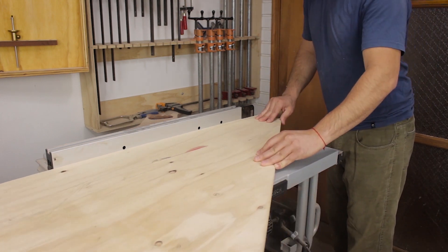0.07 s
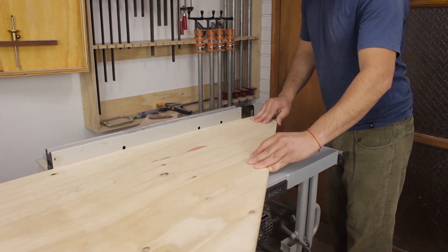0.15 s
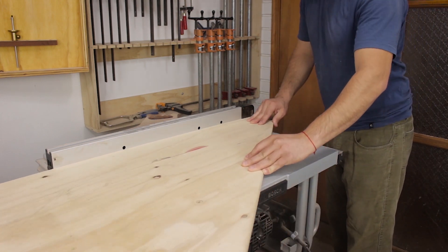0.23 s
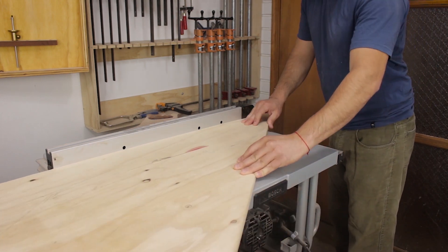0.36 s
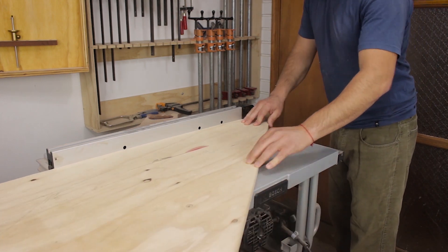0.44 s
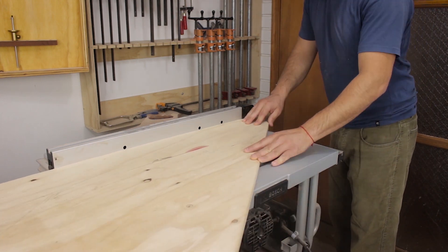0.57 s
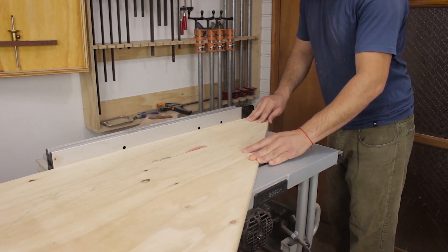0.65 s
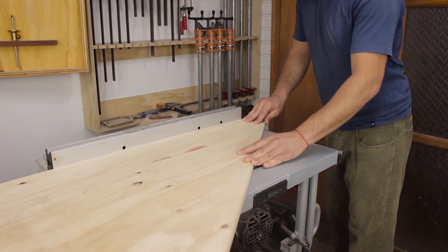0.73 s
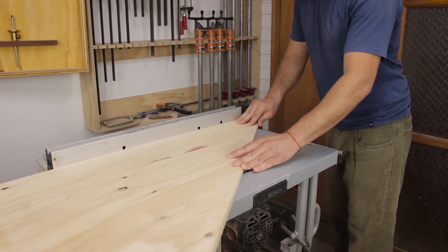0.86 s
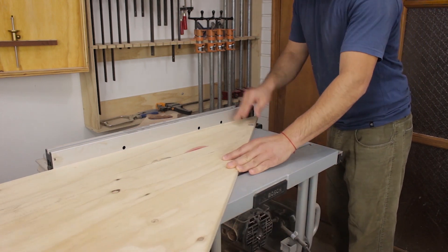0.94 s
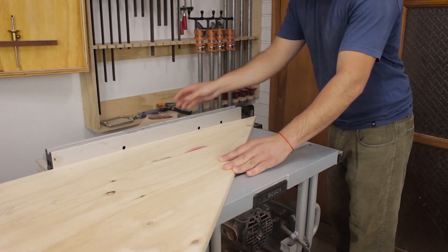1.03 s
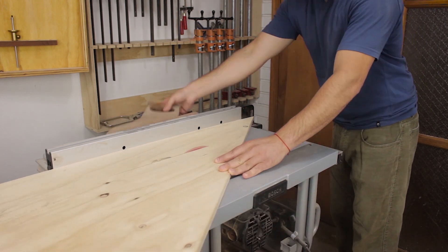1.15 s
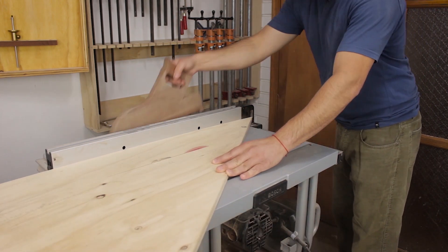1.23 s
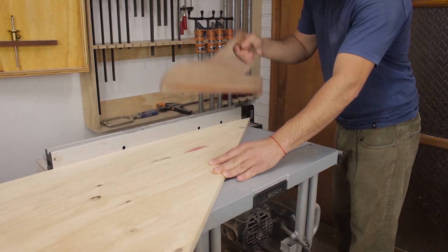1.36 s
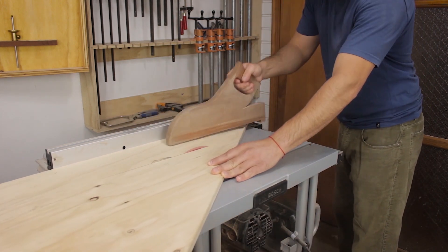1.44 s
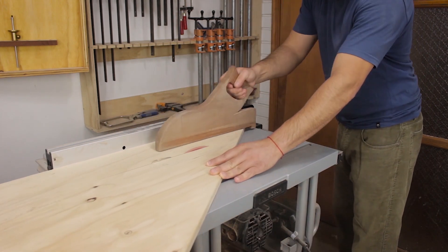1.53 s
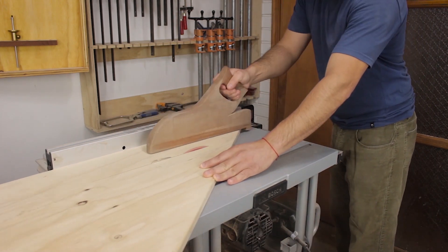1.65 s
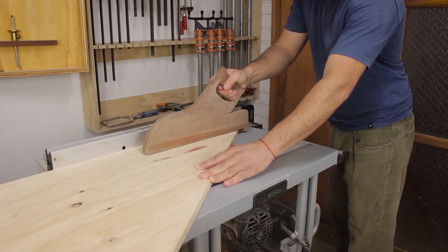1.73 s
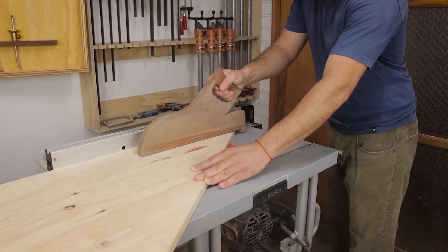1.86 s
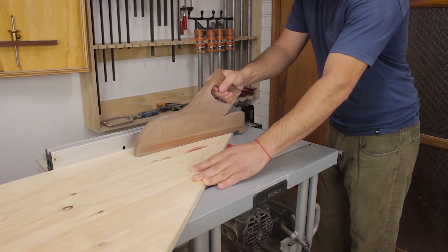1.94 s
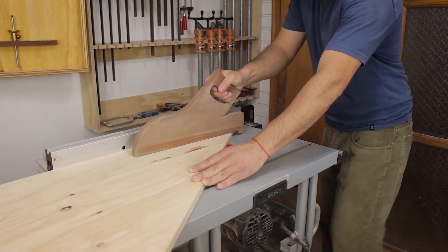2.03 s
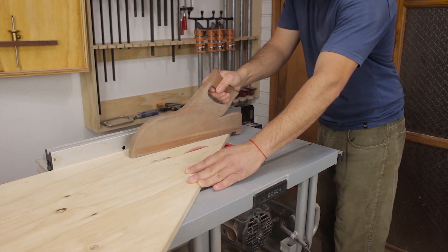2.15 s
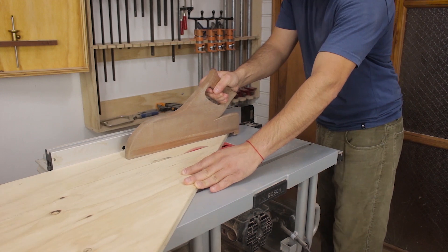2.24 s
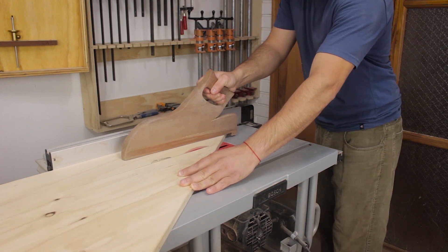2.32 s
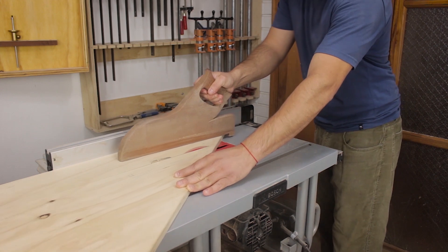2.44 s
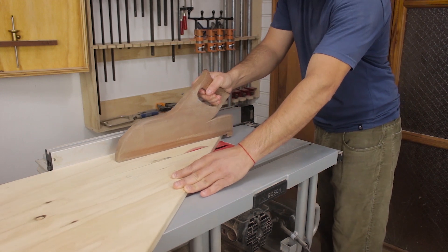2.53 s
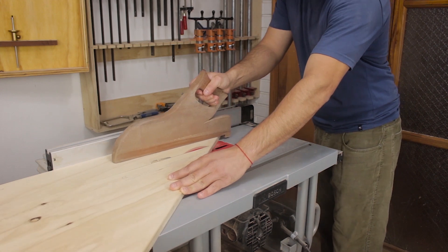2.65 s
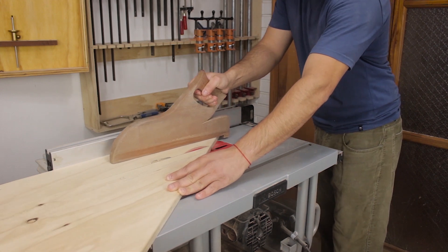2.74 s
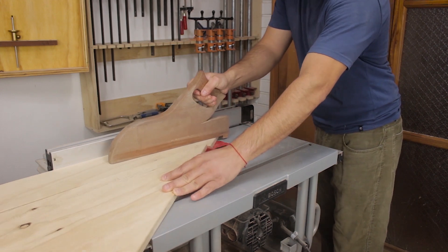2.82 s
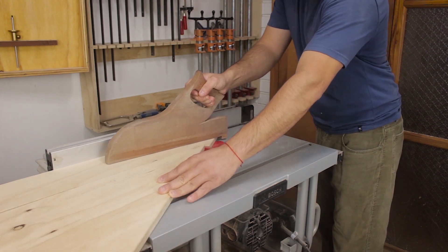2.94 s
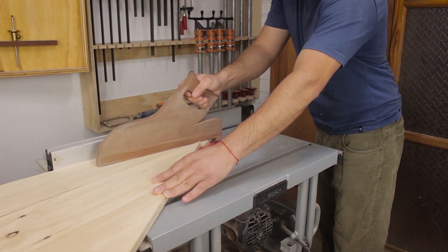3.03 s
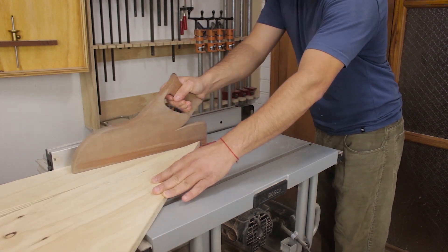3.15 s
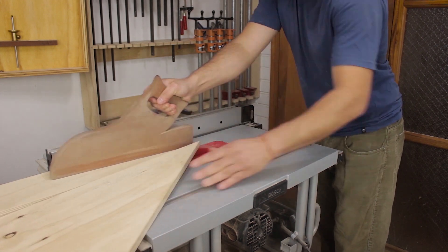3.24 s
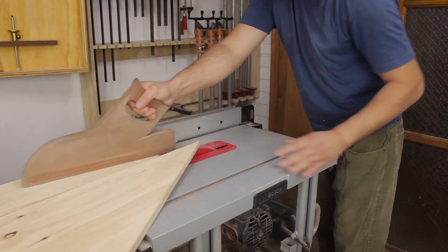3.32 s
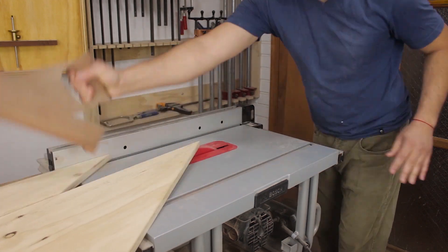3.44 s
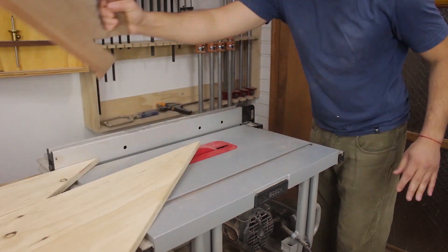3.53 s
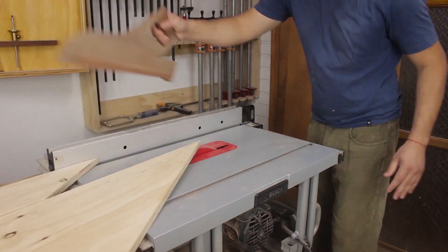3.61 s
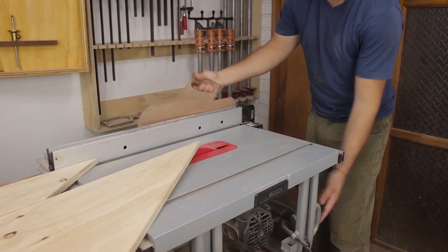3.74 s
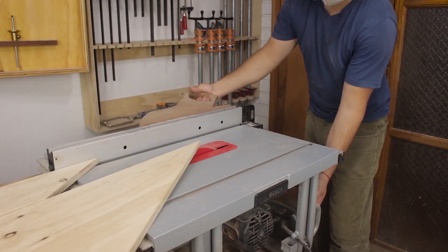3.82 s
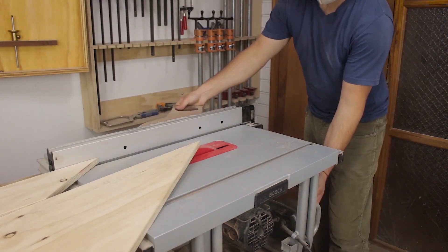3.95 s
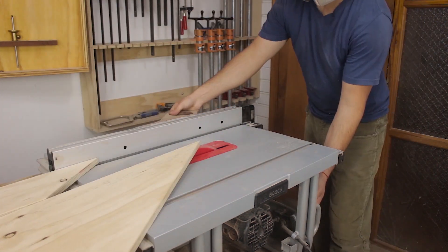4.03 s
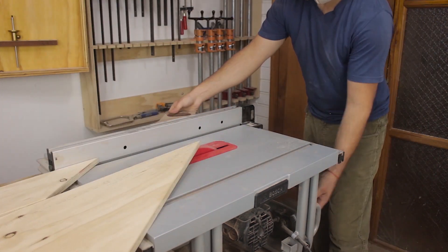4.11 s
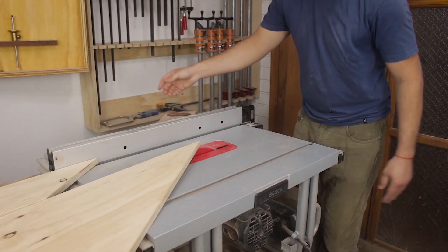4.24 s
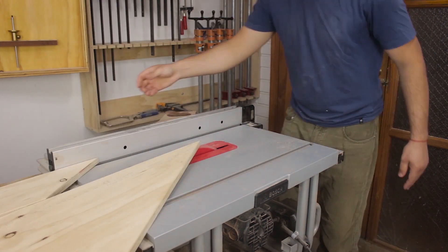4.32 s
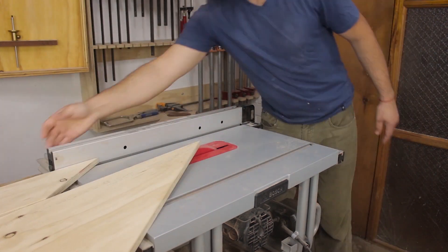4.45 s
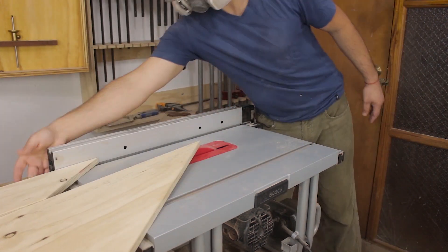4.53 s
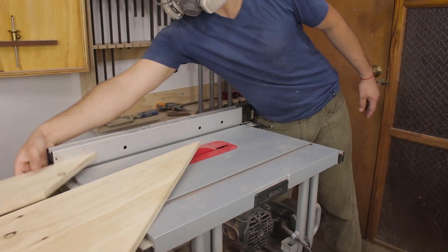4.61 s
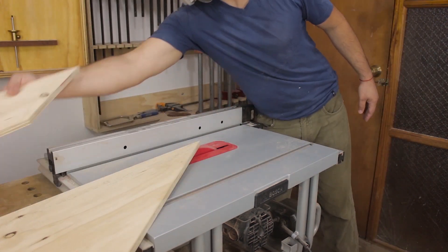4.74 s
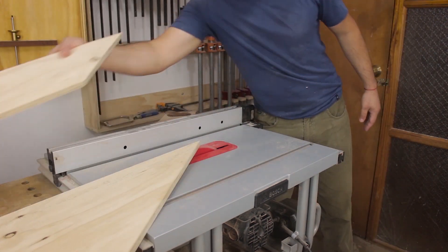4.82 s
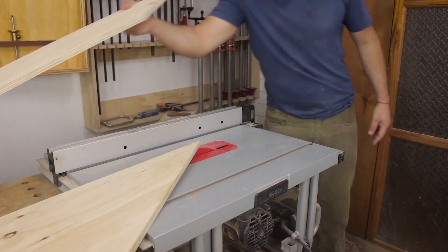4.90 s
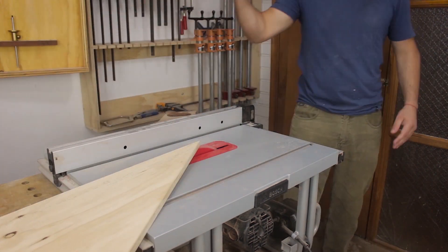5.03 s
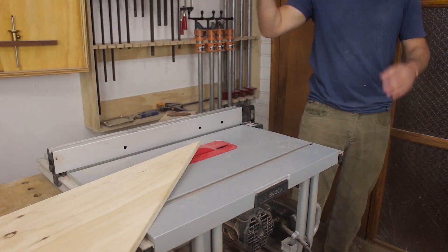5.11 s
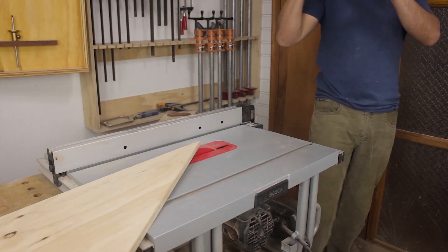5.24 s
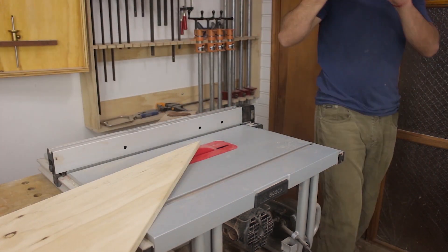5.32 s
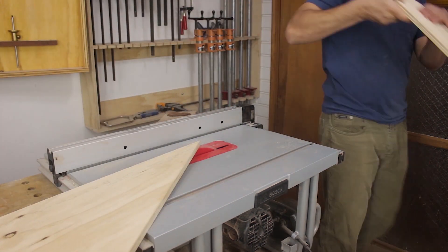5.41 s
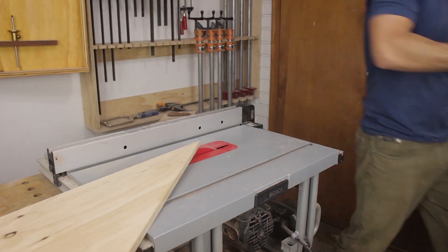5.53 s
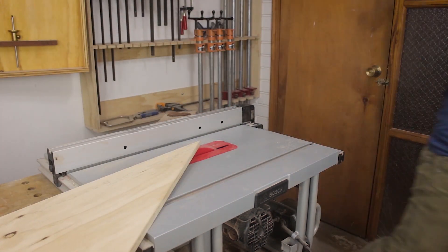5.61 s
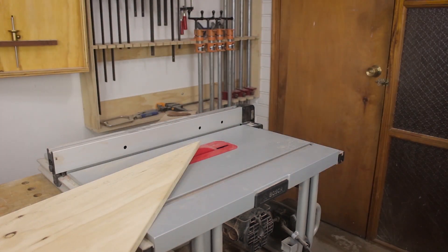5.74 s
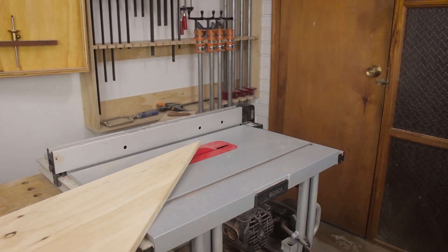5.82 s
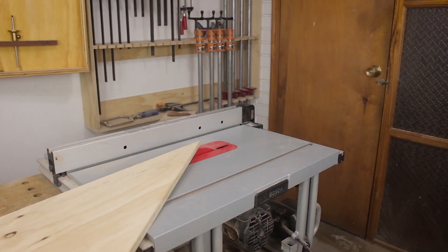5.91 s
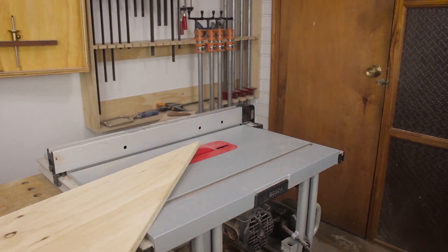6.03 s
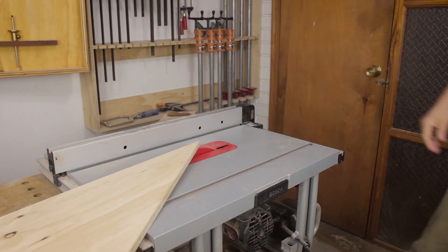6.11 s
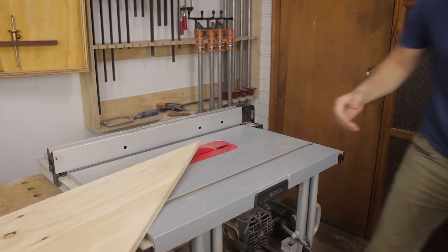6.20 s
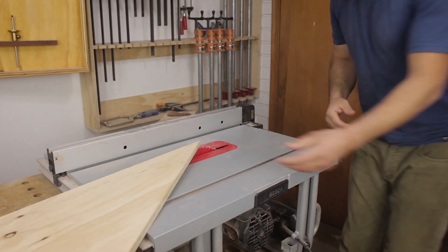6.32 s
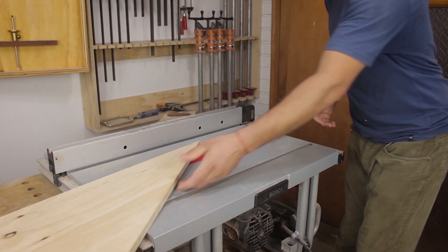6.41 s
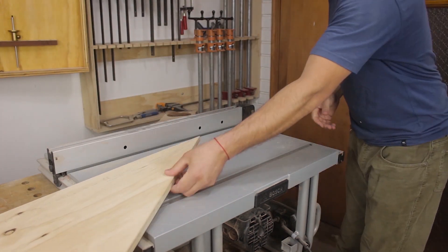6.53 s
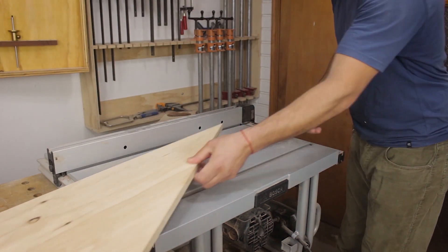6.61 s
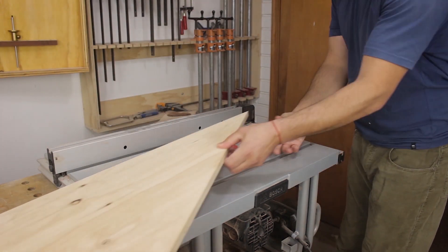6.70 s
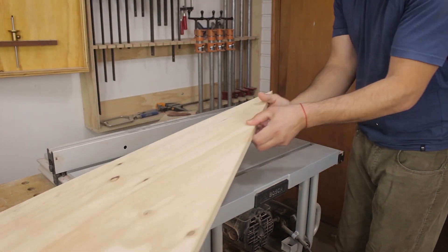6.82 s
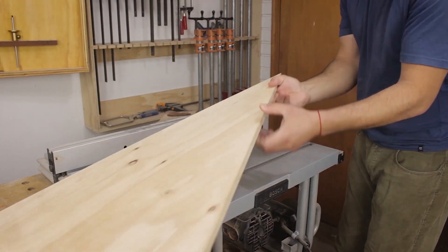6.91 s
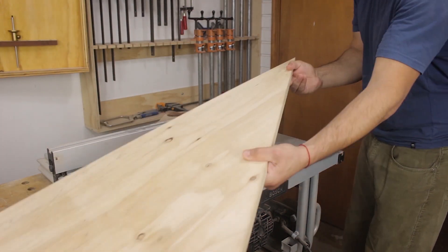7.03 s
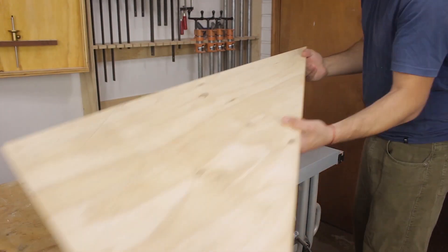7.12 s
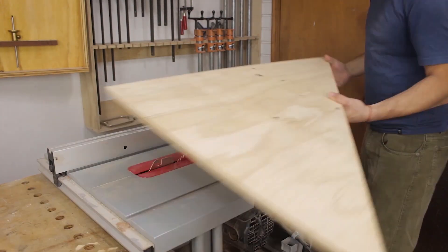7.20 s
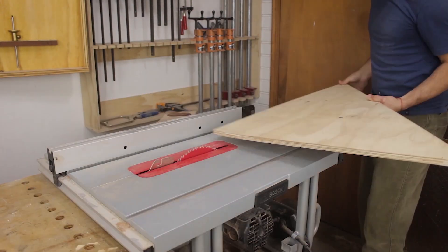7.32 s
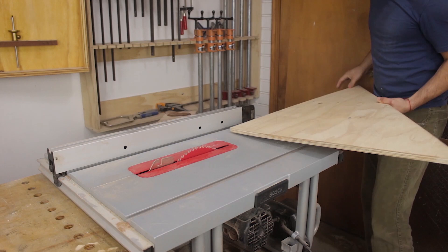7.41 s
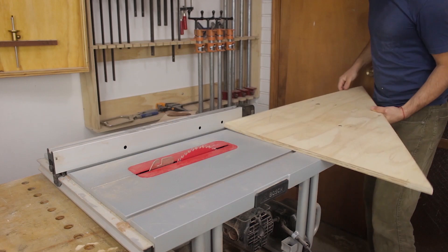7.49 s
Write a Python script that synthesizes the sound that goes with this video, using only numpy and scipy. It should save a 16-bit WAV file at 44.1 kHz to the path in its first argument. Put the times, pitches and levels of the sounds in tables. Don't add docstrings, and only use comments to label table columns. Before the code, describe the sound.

In a small workshop, a table saw is already cutting plywood, its harsh motor whine and chip hiss wavering under load. Wood knocks sharply as the cut ends, and the saw runs free, brighter and steadier. Switched off, it glides down to a stop, leaving quiet for a soft drag of the sheet and a few final knocks. One microphone, nearly mono, short room tail.

```python
import sys
import numpy as np
from scipy import signal
from scipy.fft import rfft, irfft, next_fast_len
from scipy.io import wavfile
from scipy.ndimage import uniform_filter1d, map_coordinates

SR = 44100
rng = np.random.default_rng(int(sys.argv[2]) if len(sys.argv) > 2 else 0)


def to_linear_factor(level_db):
    exponent = np.asarray(level_db, float) / 20
    return 10 ** exponent


def materialize(psi):
    bounded = np.clip(np.atleast_2d(psi).T, -1, 1)
    quanta = np.round(bounded * 32767).astype(np.int16)
    wavfile.write(sys.argv[1], SR, quanta)


N = 333396
T = np.arange(N) / SR

# [t/s, turn rate f/Hz]
DRIVEN_SPEED = [(0, 984.9), (.068, 946.5), (.219, 905.8), (.445, 897.6), (.554, 971.2), (.725, 1023.9),
                (.966, 928.5), (1.078, 935.5), (1.605, 995.3), (1.786, 958.5), (1.976, 948.2),
                (2.147, 980.5), (2.407, 947.3), (2.629, 955.8), (2.83, 992.6), (3.291, 1049.2),
                (3.639, 1064), (4.11, 1069)]
# [t/s, hiss level/dB, tooth whine level/dB, side load on the blade level/dB]
FEED = [(0, -27.5, -28.5, -8), (.12, -28, -29.5, 3.5), (.4, -27, -28.5, -2), (.55, -30, -52.5, -6),
        (.68, -31.5, -40, -5), (.95, -28, -30.5, 2), (1.17, -29, -56.5, 1), (1.45, -29, -36, -6),
        (1.57, -29, -36.5, 1), (1.85, -28, -32, -2.5), (1.98, -27.5, -66, 6.5), (2.3, -27.5, -29.5, -3),
        (2.52, -26.5, -39, 1.5), (2.88, -29, -35.5, -3.5), (2.95, -26.5, -26.5, 0), (3.02, -29, -37, 2.5),
        (3.35, -30, -56.5, -3), (4.1, -30, -62, 1)]
# [t/s, share]
BITE = [(0, 0.9), (2.7, 0.83), (3.3, 0.11)]
# [multiple of the turn rate], and for each [level/dB]
WEAK_ORDERS = [1.333, 2, 4, 5, 5.25, 7, 9, 13, 15, 16, 17, 18, 19, 20, 23, 26, 27, 30, 32, 37, 40, 48]
WEAK_ORDER_DB = [-15, -18, -23, -23, -19, -20, -18, -18, -17, -10, -16, -20, -17, -8, -16, -19, -14, -11,
                 -15, -17, -11, -14]
# [f/Hz, level/dB]
CASING = [(150, -34), (500, -20), (1200, -8), (3000, -6), (6000, -2), (11500, 0), (15600, -10)]
# [f/Hz, level per Hz/dB]
CHIP_COLOUR = [(18, -68.5), (30, -54), (193, -31), (301, -23.5), (423, -21.5), (733, -9), (928, -4),
               (1030, -5.5), (1240, -2), (2200, -7), (2790, -4), (3180, -3.5), (5510, -10), (9800, -1.5),
               (15700, -9)]
FAN_COLOUR = [(30, -49.5), (180, -45.5), (650, -16), (1250, -5), (2260, -5.5), (3620, -1.5), (5360, -5),
              (10500, 1), (12700, 3), (13300, -7), (15700, -22.5)]
BEARING_COLOUR = [(18, -93), (30, -56.5), (95, -58), (343, -28.5), (495, -16.5), (1270, -9.5), (2510, -12),
                  (2790, -12), (4710, -7.5), (5650, -3.5), (8370, -7.5), (11500, -1), (15700, -19)]
# [turn rate f/Hz, level/dB]
HISS_BY_SPEED = [(18, -69), (40, -45), (78, -29.5), (158, -20.5), (300, -17), (570, -11), (800, -5),
                 (1000, 0)]
RUMBLE_BY_SPEED = [(12, 16), (40, 19.5), (78, 8), (160, 2.5), (300, -2), (520, -6.5), (750, -1),
                   (1000, -4.5)]
# [width f/Hz, gain at speed level/dB, gain coasting level/dB]
BLADE_HZ = [235, 1278, 1660, 2790, 3850, 4970, 5310, 5570, 7060, 7685, 7857, 8190, 8860, 9540, 10780, 11730,
            12700, 12900, 13575, 13700, 15000]
BLADE_GAIN = [(30, 3, 10), (30, 5, 7), (60, 2, 3), (60, 1, 14), (60, 1, 2), (40, 6, 2), (45, 0, 12),
              (70, 0, 13), (60, 3, 2), (30, 6, 1), (30, 11, 6), (40, 5, 3), (50, 4, 3), (70, 3, 8),
              (35, 6, 5), (45, 4, 6), (35, 5, 2), (35, 6, 2), (30, 11, 4), (20, 8, 2), (40, 5, 1)]
# [f/Hz, width f/Hz, level/dB under the sheet, level/dB free]
FRAME = [(235, 30, -23, -21.5), (343, 26, -25.5, -27), (430, 60, -33, -33), (520, 60, -33.5, -34.5),
         (670, 100, -37, -37), (756, 26, -30.5, -28), (819, 40, -24.5, -26), (903, 59, -38, -28),
         (947, 31, -37, -37), (1853, 52, -40, -33.5), (2430, 44, -38, -27.5), (2534, 90, -38, -29),
         (2705, 62, -35, -28), (2852, 87, -33, -36)]
# [f/Hz, level/dB]
ARMATURE_LOW = [(300, -88), (3000, -59), (7000, -72.5), (9400, -57.5), (9900, -53.5), (10480, -40.5),
                (10800, -48.5), (12000, -52.5)]
ARMATURE_HIGH = [(1500, -82), (6200, -59), (8700, -47), (10250, -47), (11000, -43.5), (11700, -36.5),
                 (12500, -47), (12900, -38)]
GEAR = [(600, -58), (3400, -46), (4300, -57.5), (5400, -38), (7300, -42.5), (8600, -57), (9700, -27),
        (10800, -52)]
# [f/Hz, level/dB]
MAINS = [(300, -70.5), (480, -71.5), (600, -63.5)]
# [f/Hz, level/dB]
RING_OUT = [(5300, -94), (5590, -90), (5930, -95)]
# [t/s, peak level/dB, body f/Hz, crack minus peak level/dB, t60 t/s]
KNOCKS = [(0.189, -30, 923, -8, 0.19), (1.511, -19, 950, -14, 0.033), (2.899, -33, 1160, -26, 0.073),
          (2.943, -23.5, 1400, -8, 0.076), (3.081, -18.5, 1343, 0, 0.089), (3.516, -18.5, 947, 4.5, 0.078),
          (3.549, -23.5, 1166, 8.5, 0.15), (3.579, -25, 1390, -8, 0.073), (5.864, -36, 1210, -8, 0.047),
          (5.981, -42, 1250, -2, 0.1), (6.504, -66.5, 540, 0, 0.084), (6.528, -67.5, 690, 1, 0.098),
          (6.555, -52.5, 883, -24, 0.08), (6.599, -73, 818, 9, 0.087), (7.009, -47.5, 520, 1, 0.21),
          (7.154, -47.5, 368, -9.5, 0.047), (7.309, -62.5, 1470, 7, 0.059), (7.364, -79, 301, 4, 0.08),
          (7.463, -42.5, 586, -6.5, 0.054), (7.538, -42, 1310, 5, 0.041), (7.546, -38, 559, 0, 0.066),
          (7.555, -29, 800, 3.5, 0.091)]
# [ratio to body pitch, level/dB]
WOOD = [(1, 0), (1.45, -5), (2.1, -5), (3.1, -5), (4.4, -8)]
# [t/s, attack t/s, hold t/s, level/dB, bright minus dull level/dB]
STROKES = [
    (6.495, 0.043, .02, -79, 0),
    (6.639, 0.1, 0.33, -57, -0.5),
    (6.953, 0.1, 0.0076, -51.5, -6.5),
    (7.198, 0.21, .1, -86.5, 15),
    (7.301, 0.0056, .002, -74, -19),
    (7.457, 0.0073, .002, -67, -23),
]
# [f/Hz, level per Hz/dB]
SHEET_COLOUR = [(60, -42.5), (160, -22), (400, -10.5), (1900, 0.5), (5000, -4), (10800, -9), (15700, -18)]
# [f/Hz, width f/Hz, gain level/dB]
SHEET_MODES = [(390, 50, 8), (745, 24, 17), (1370, 90, 6), (1600, 80, 6), (1900, 150, 5), (2900, 150, 5)]
# [f/Hz, level per Hz/dB]
QUIET_COLOUR = [(60, -30), (250, -12), (600, 0), (1700, -8), (15700, -20)]
# [t/s, low f/Hz, high f/Hz]
SIDE_SPECKS = [(0.639, 6120.0, 7750.0), (0.824, 10080.0, 11890.0), (1.173, 6800.0, 8440.0),
               (1.242, 6120.0, 9910.0), (1.501, 4130.0, 5340.0), (2.032, 8700.0, 10510.0),
               (2.426, 4130.0, 6980.0), (2.633, 5000.0, 6460.0), (2.635, 14300.0, 16020.0),
               (3.03, 4130.0, 5340.0), (3.402, 4130.0, 5860.0), (3.68, 4130.0, 7750.0),
               (4.145, 11540.0, 13260.0), (4.145, 14380.0, 15930.0), (4.586, 4130.0, 6370.0),
               (6.792, 13700.0, 15250.0)]

ARMATURE, MESH, TEETH, SHAKES = (11, 12), 10, 10.5, (1, 2, 3)
BLADE_PER_TURN, RATTLES_PER_TURN = .175, 1.6
SHAKE_DB, SHAKE_DB_PER_OCTAVE = (0, -3, 1), (22, 27, 39.5)
GEAR_LOADED_DB, FLUTTER_DB, RUMBLE_LOADED_DB = -45.5, 3.5, -8
LOADED_DB = -2
OVERTONE_SHARE = 0.56
COAST_ORDERS_DB, COAST_BLUR = -3, .018
OFF_S, INERTIA_S, REST_HZ = 4.14, .065, 32
COAST_S, STOP_S, COAST_HZ, COAST_POWER, FIELD_HZ, FIELD_S = 4.12, 6.5445, 1042, 1.4255, 27.5, .135
SAG_DB_PER_S, RELEASE_DB_PER_S, ATTACK_POWER = 33, 294, 1.36
ROOM_T60_S, QUIET_DB = .22, -88
CEILING, TOP_HZ = .24, 15720


def unit(x):
    return x / np.sqrt(np.mean(x ** 2))


def curves(table):
    s, *columns = np.transpose(table)
    return [np.interp(T, s, c) for c in columns]


def shade(colour, hz):
    f, db = np.transpose(colour)
    return np.interp(np.log(hz), np.log(f), db, right=-90)


def noise(colour):
    size = next_fast_len(N)
    gain = to_linear_factor(shade(colour, np.fft.rfftfreq(size, 1 / SR) + 1))
    return unit(irfft(rfft(rng.standard_normal(size)) * gain, size)[:N])


def walk(rate):
    steps = np.repeat(rng.standard_normal(int(T[-1] * rate) + 2), 8)
    steps = uniform_filter1d(uniform_filter1d(steps, size=8), size=8)
    return 1.3 * np.interp(T * rate * 8, np.arange(len(steps)), steps)


def band(x, hz, width):
    return signal.lfilter(*signal.iirpeak(hz, hz / width, SR), x)


def split(x, edge_hz):
    low = signal.sosfiltfilt(signal.butter(2, edge_hz, fs=SR, output="sos"), x)
    return low, x - low


def room(x, wet_db, edge_hz):
    t = T[:SR // 4]
    tail = rng.standard_normal(len(t)) * np.exp(-np.log(1000) * t / ROOM_T60_S) * (t > .003)
    tail, _ = split(tail, edge_hz)
    return x + to_linear_factor(wet_db) * signal.oaconvolve(x, tail / np.sqrt(np.sum(tail ** 2)))[:N]


def order(turns, k, db, wobble, rough):
    blade_angle = 2 * np.pi * (BLADE_PER_TURN * turns + rng.random())
    beat = np.exp(wobble * np.cos(blade_angle)) / np.sqrt(np.i0(2 * wobble))
    return np.sqrt(2) * to_linear_factor(db) * beat * np.sin(2 * np.pi * k * turns + rough * walk(70))


def rattle(turns, k, db):
    steps = turns * RATTLES_PER_TURN
    count = int(steps[-1]) + 2
    size = np.interp(steps, np.arange(count), rng.standard_normal(count))
    return (.4 + size) * order(turns, k, db, wobble=0.45, rough=.4)


def speed():
    size = int(INERTIA_S * SR)
    driven, = curves(DRIVEN_SPEED)
    for _ in range(2):
        driven = uniform_filter1d(driven, size=size, mode="nearest")
    left = np.clip((STOP_S - T) / (STOP_S - COAST_S), 0, None)
    coast = COAST_HZ * left ** COAST_POWER + FIELD_HZ * np.exp((COAST_S - T) / FIELD_S)
    return np.maximum(np.minimum(driven, coast), 1)


def hiss(hz, turns, bite, spin):
    fan = map_coordinates(noise(FAN_COLOUR), [turns * SR / hz.max()], order=3)
    free = np.sqrt(spin) * fan + np.sqrt(1 - spin) * noise(BEARING_COLOUR)
    air = np.sqrt(bite) * noise(CHIP_COLOUR) + np.sqrt(1 - bite) * free
    low, high = split(air, edge_hz=1820)
    rumble_db = shade(RUMBLE_BY_SPEED, .99 * np.minimum(hz, 1000)) + RUMBLE_LOADED_DB * bite
    rumble = unit(low) * to_linear_factor(rumble_db - 5.5 + 2.1 * walk(7))
    spray = high * to_linear_factor(0.72 * walk(9.8) + .5 * walk(30))
    return to_linear_factor(-.6) * room(spray + rumble, wet_db=-8, edge_hz=9000)


def weak_whines(hz, turns, bite, spin, rest_db):
    out = np.zeros(N)
    for k, db in zip(WEAK_ORDERS, WEAK_ORDER_DB):
        heard_db = db + shade(CASING, k * hz) - 5 * bite + 3 * walk(9) + rest_db
        if k % MESH:
            heard_db = heard_db + COAST_ORDERS_DB * (1 - spin)
            rough = 0.35 + COAST_BLUR * k * (1 - bite)
            out = out + order(turns, k, heard_db, wobble=.15, rough=rough)
        else:
            gear_db = np.clip(shade(GEAR, k * hz) + 45, -9, 9) * (k * hz < GEAR[-1][0])
            out = out + rattle(turns, k, heard_db + OVERTONE_SHARE * gear_db)
    return out


def gear_whine(hz, turns, bite, rest_db):
    loaded_db = GEAR_LOADED_DB + 2 * FLUTTER_DB * walk(17)
    mesh_db = bite * loaded_db + (1 - bite) * shade(GEAR, MESH * hz) + rest_db
    loaded = order(turns, MESH, mesh_db, wobble=0.2, rough=0.36)
    return bite * loaded + (1 - bite) * rattle(turns, MESH, mesh_db - 4)


def blade(drive, spin):
    out = drive
    for f, (width, speed_db, coast_db) in zip(BLADE_HZ, BLADE_GAIN):
        gain = to_linear_factor(spin * speed_db + (1 - spin) * coast_db + 1.5 * walk(5))
        out = out + band(drive, f, width) * (gain - 1)
    return out


def frame(hz, bite):
    step = 64
    power = 0
    for f, width, cut_db, free_db in FRAME:
        db = free_db + (cut_db - free_db) * bite[::step]
        power = power + to_linear_factor(2 * db) / (1 + (2 * (hz[::step] - f) / width) ** 2) ** 2
    return np.interp(T, T[::step], 10 * np.log10(power))


def frame_shake(hz, turns, bite, grip_db, rest_db):
    out = np.zeros(N)
    for k, db, slope_db in zip(SHAKES, SHAKE_DB, SHAKE_DB_PER_OCTAVE):
        db = db + slope_db * np.log2(hz / 1000) + frame(k * hz, bite) + 0.53 * walk(11)
        db = db + rest_db + grip_db * (k == SHAKES[-1])
        out = out + order(turns, k, db, wobble=0.05, rough=0.22)
    return out


def armature_whine(hz, turns, bite, grip_db, rest_db):
    out = np.zeros(N)
    for k, colour in zip(ARMATURE, (ARMATURE_LOW, ARMATURE_HIGH)):
        db = shade(colour, k * hz) + LOADED_DB * bite + rest_db + FLUTTER_DB * walk(20)
        db = db + grip_db * (k == ARMATURE[0])
        out = out + order(turns, k, db, wobble=.2, rough=.4)
    return out


def tooth_whine(turns, bite, teeth_db):
    return order(turns, TEETH, teeth_db + 1.7 * walk(12), wobble=.2, rough=.3) * np.sqrt(bite)


def blade_turn(turns, bite):
    return order(turns, BLADE_PER_TURN, -76.5, wobble=0, rough=0.27) * (1 - bite) * (T < OFF_S)


def mains_hum():
    tones = sum(to_linear_factor(db + 2 * walk(5.6)) * np.sin(2 * np.pi * f * T) for f, db in MAINS)
    return tones * (T < OFF_S)


def ring_out():
    tones = sum(to_linear_factor(db - 25 * (T - 6.5)) * np.sin(2 * np.pi * f * T) for f, db in RING_OUT)
    return tones * np.clip((T - 6.1) / 0.12, 0, 1)


def saw():
    hz = speed()
    turns = np.cumsum(hz) / SR
    bite, = curves(BITE)
    hiss_db, teeth_db, grip_db = curves(FEED)
    slowed_db = shade(HISS_BY_SPEED, .99 * np.minimum(hz, 1000))
    rest_db = -60 * np.clip(3 - 3 * hz / REST_HZ, 0, 1)
    spin = np.clip((hz - 350) / 600, 0, 1)
    drive = hiss(hz, turns, bite, spin) + weak_whines(hz, turns, bite, spin, rest_db)
    drive = drive * to_linear_factor(hiss_db + slowed_db) + gear_whine(hz, turns, bite, rest_db)
    out = blade(drive, spin) + frame_shake(hz, turns, bite, grip_db, rest_db)
    out = out + armature_whine(hz, turns, bite, grip_db, rest_db)
    out = out + tooth_whine(turns, bite, teeth_db + slowed_db)
    return out + blade_turn(turns, bite) + mains_hum() + ring_out()


def room_floor():
    return to_linear_factor(QUIET_DB) * noise(QUIET_COLOUR)


def knocks():
    out, t = np.zeros(N + SR), T[:SR // 3]
    for s, db, hz, crack_db, t60 in KNOCKS:
        fade = np.exp(-np.log(1000) * t / np.clip(t60, .01, .4))
        modes = sum(to_linear_factor(g) * np.sin(2 * np.pi * r * hz * t) * fade ** np.sqrt(r) for r, g in WOOD)
        dull, crack = split(rng.standard_normal(len(t)), edge_hz=2200)
        crack, snap = split(crack, edge_hz=7200)
        crack = crack + 0.11 * snap
        hit = 0.26 * modes + 0.75 * dull * fade + to_linear_factor(crack_db) * 0.84 * crack * fade ** 0.59
        i = int(s * SR)
        out[i:i + len(t)] += to_linear_factor(db) * hit * np.clip(t / 0.0005, 0, 1)
    return out[:N]


def strokes():
    dull = bright = 0
    for s, attack, hold, db, bright_db in STROKES:
        since = np.clip(T - s - attack, 0, None)
        fall_db = SAG_DB_PER_S * np.minimum(since, hold) + RELEASE_DB_PER_S * np.clip(since - hold, 0, None)
        press = np.clip((T - s) / attack, 0, 1) ** ATTACK_POWER * to_linear_factor(db - fall_db)
        dull, bright = dull + press, bright + press * to_linear_factor(bright_db)
    return dull, bright


def drag():
    dull, bright = strokes()
    rub = noise(SHEET_COLOUR) * to_linear_factor(1.5 * walk(150) + .8 * walk(30))
    rub = rub + sum(band(rub, f, w) * (to_linear_factor(g + 2 * walk(10)) - 1) for f, w, g in SHEET_MODES)
    low, high = split(rub, edge_hz=3400)
    return unit(low) * dull + unit(high) * bright


def scene():
    thud, blows = split(room(knocks(), wet_db=-8, edge_hz=3200), edge_hz=304)
    mono = saw() + room_floor() + blows + to_linear_factor(-19.5) * thud + drag()
    return np.array([mono, mono])


def band_limit(x):
    return signal.sosfilt(signal.butter(12, 16830, fs=SR, output="sos"), x)


def record(dry):
    top_cut = signal.ellip(10, .1, 80, TOP_HZ, fs=SR, output="sos")
    mid = signal.sosfilt(top_cut, CEILING * np.tanh(dry[0] / CEILING))
    side, size = np.zeros(N), 2048
    for s, low_hz, high_hz in SIDE_SPECKS:
        start = int(s * SR) - size // 2
        at = slice(start, start + size)
        sos = signal.butter(6, (low_hz, min(high_hz, TOP_HZ)), "band", fs=SR, output="sos")
        speck = unit(signal.sosfilt(sos, rng.standard_normal(size))) * np.sqrt(np.hanning(size))
        side[at] += to_linear_factor(-4.5) * np.std(signal.sosfilt(sos, mid[at])) * speck
    return band_limit(np.array([mid + side, mid - side]))


dry = scene()
out = record(dry)
materialize(out)
```